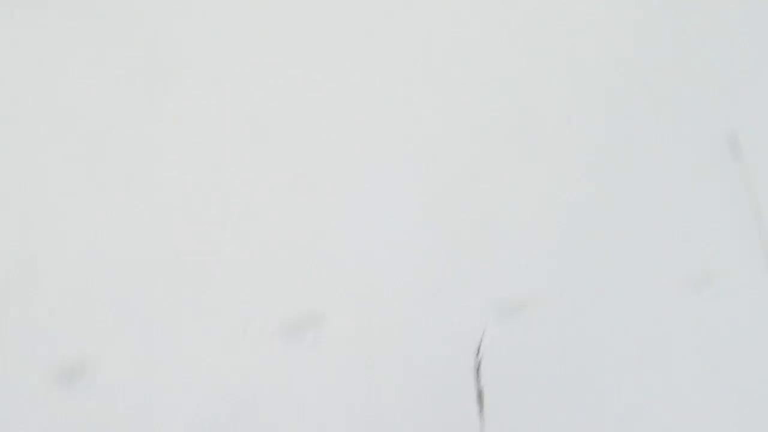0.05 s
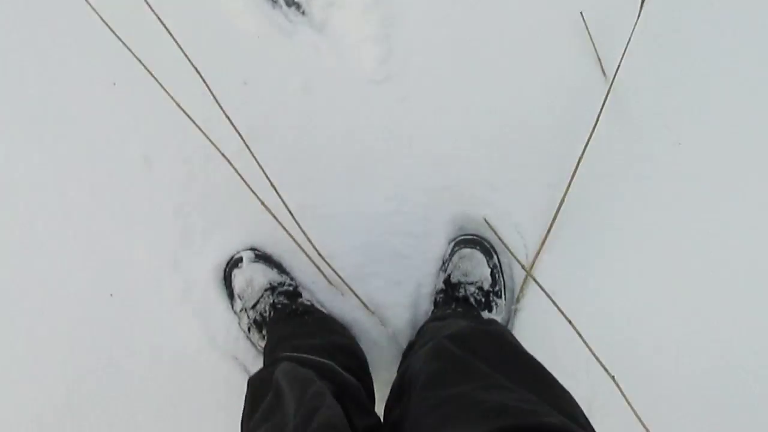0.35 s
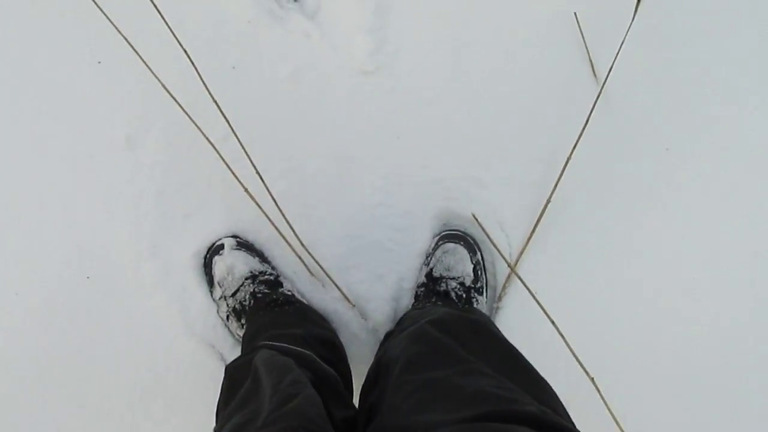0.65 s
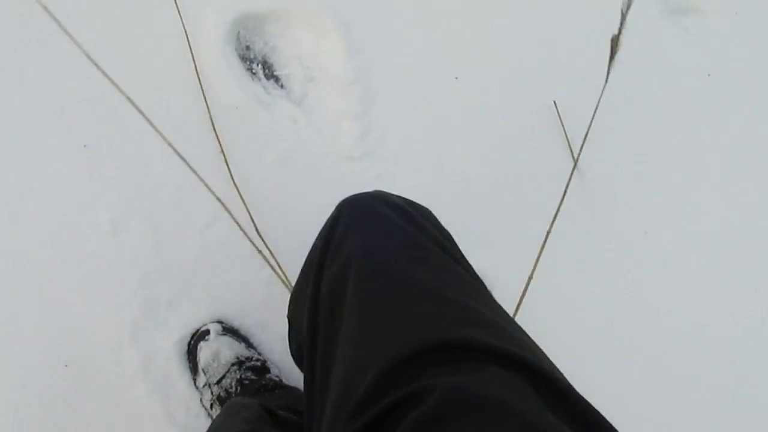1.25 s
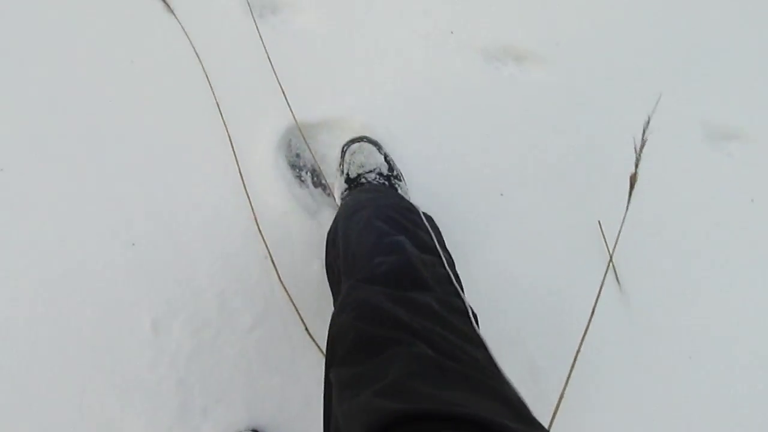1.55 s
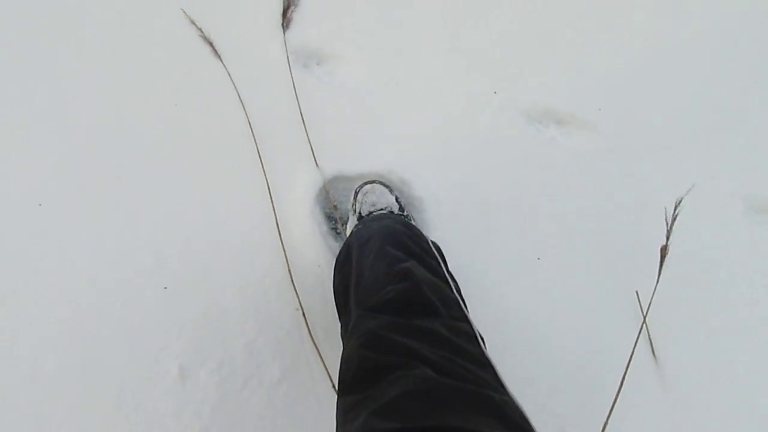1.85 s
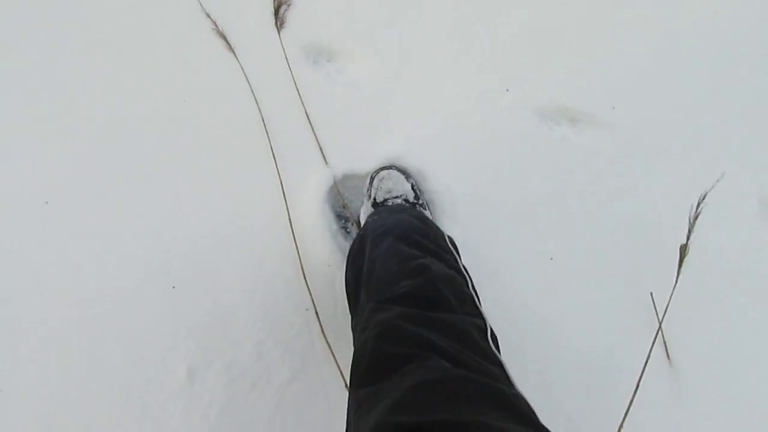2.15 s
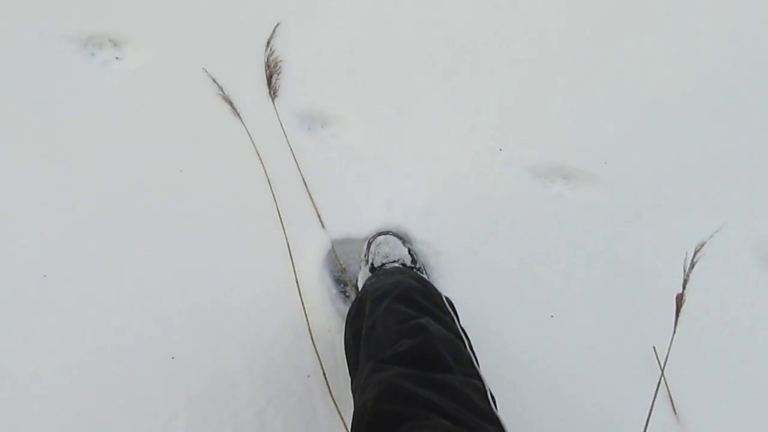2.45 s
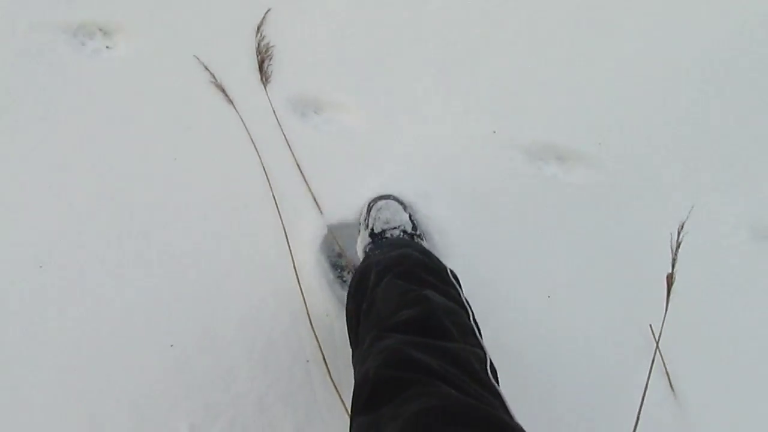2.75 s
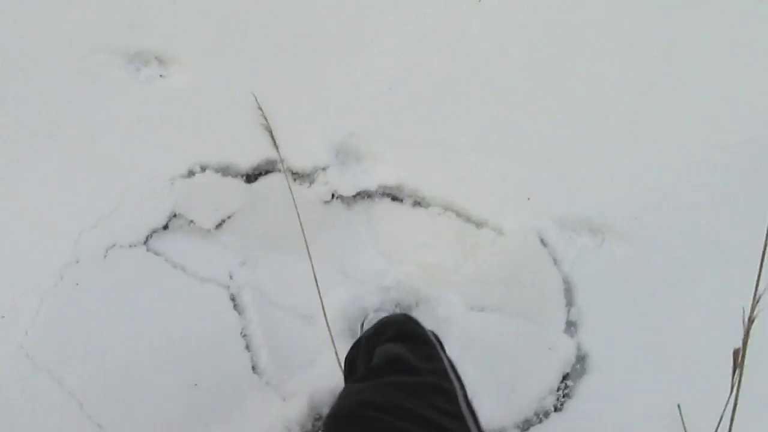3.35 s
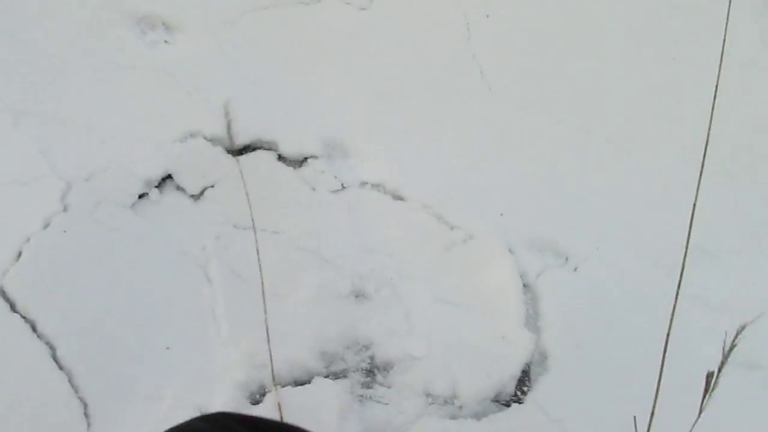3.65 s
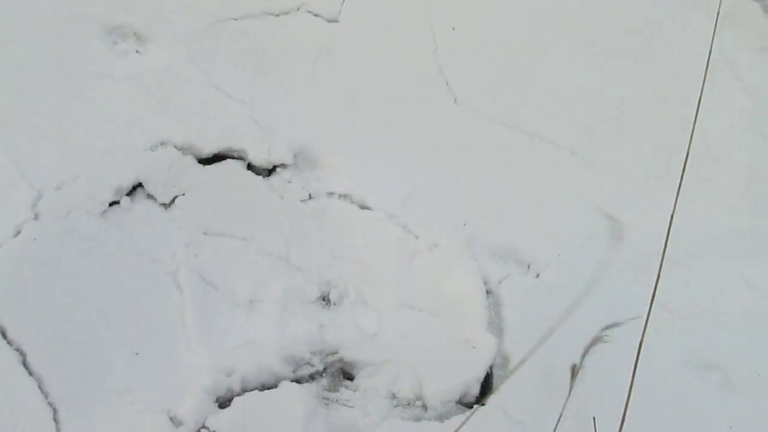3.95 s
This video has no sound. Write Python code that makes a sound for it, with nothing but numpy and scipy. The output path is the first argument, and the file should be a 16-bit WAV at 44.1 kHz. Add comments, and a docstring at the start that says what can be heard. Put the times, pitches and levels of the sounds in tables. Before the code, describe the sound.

Thin ice snaps sharply under a boot outdoors, then snow crunches softly and trousers rustle. The sheet breaks with a thump and crumbles with a faint slosh. Wind briefly buffets the close microphone, mostly on the left.

```python
"""Thin ice giving way

Outdoors on snow-covered ice, a walker edges out. Snow crunches and clicks under the boot, trousers
rustle, and the sheet snaps a few times under the shifting weight. Then it fails with a thump and
crumbles into the water. Wind buffets the hand-held stereo microphone, mostly on the left."""
import sys
import numpy as np
from scipy import signal
from scipy.fft import rfft, irfft
from scipy.io import wavfile
from scipy.ndimage import uniform_filter1d

SR = 44100
rng = np.random.default_rng(int(sys.argv[2]) if len(sys.argv) > 2 else 0)


def put_to_file(sound):
    """Save the sound as 16-bit audio at rate SR, in the file named by the first command-line argument."""
    columns = np.atleast_2d(sound).T  # one column per channel
    safe = np.clip(columns, -1, 1)
    whole_steps = np.round(safe * 32767)
    wavfile.write(sys.argv[1], SR, whole_steps.astype(np.int16))


N = 176400
BREAK_S = 3.1731  # the sheet gives way
SPREAD_HZ = 2540  # above this the two sides hear different things

# Low rumble of the breeze and of the dropping sheet: frequency_hz, level_db
RUMBLE_SPECTRUM = [(15, -15.5), (35, 4.5), (80, 2.5), (140, -3), (250, -19), (500, -30), (1500, -56.5)]
# Small brittle fractures in snow and ice: frequency_hz, level_db
FRACTURE_SPECTRUM = [(80, -33), (350, -1), (1300, 4), (2500, -5.5), (5500, -8), (10000, -16.5),
                     (16000, -28.5)]


def undb(db):
    return 10 ** (np.asarray(db) / 20)


def times():
    return np.arange(N) / SR


def curve(rows, column=1):
    """One column of a table, joined by straight lines in time."""
    rows = np.array(rows)
    return np.interp(times(), rows[:, 0], rows[:, column])


def pan(db):
    """Left and right gains for a level difference, left minus right."""
    return undb(np.array([np.atleast_1d(db), -np.atleast_1d(db)]) / 2)


def colour(x, spectrum):
    """Minimum-phase filter of unit power with the given (Hz, dB) shape."""
    points, size = np.array(spectrum), 4096
    hz = np.maximum(np.fft.rfftfreq(size, 1 / SR), 1)
    shape_db = np.interp(np.log(hz), np.log(points[:, 0]), points[:, 1])
    cepstrum = irfft(np.log(undb(shape_db)))
    cepstrum[1:size // 2] *= 2
    cepstrum[size // 2 + 1:] = 0
    impulse = irfft(np.exp(rfft(cepstrum)))
    return signal.fftconvolve(x, impulse[None] / np.linalg.norm(impulse), axes=1)[:, :N]


def highpass(x, hz, order=2):
    return signal.sosfilt(signal.butter(order, hz, "high", fs=SR, output="sos"), x)


def widen(x):
    """Two unrelated signals become a pair with common bass and diffuse treble, leaning right."""
    side = 0.97 * highpass(x[1], SPREAD_HZ, order=1)
    return x[0] + np.array([side, -side]) * pan(db=-5.5)


def wander(per_s):
    """Smooth random drift of spread near 1."""
    hold = max(int(SR / per_s), 1)
    return uniform_filter1d(np.repeat(rng.standard_normal(N // hold + 1), hold), hold)[:N]


def grains(per_s, scatter_db):
    """Tiny impulses at random moments and of uneven size; two signals of unit power."""
    hits = rng.random(N) < per_s / SR
    size = undb(scatter_db * np.clip(rng.standard_normal(N), -2, 2))
    x = hits * size * rng.choice([-1, 1], (2, N))
    return x / np.std(x)


def burst(start_s, swell_ms, decay_ms):
    """Straight rise, then exponential decay."""
    ms = (times() - start_s) * 1000
    return np.clip(ms / swell_ms, 0, 1) * np.exp(-np.clip((ms - swell_ms) / decay_ms, 0, 50))


def ring(start_s, hz, decay_ms):
    """A damped sine."""
    age = np.maximum(times() - start_s, 0)
    return np.sin(2 * np.pi * hz * age) * np.exp(-np.minimum(age * 1000 / decay_ms, 50))


def buffeting():
    """Gusts and single eddies hit each microphone port separately; weaker eddies thud lower."""
    # Gusts on the microphone: start_s, length_s, level_db, left_minus_right_db
    gusts = [(.0, .12, -14.5, 32), (0.12, 0.075, -23, 25), (0.224, 0.073, -23.5, 9),
             (1.596, 0.089, -26.5, -2.5)]
    # Turbulence at the ports: frequency_hz, level_db
    gust_spectrum = [(20, -18), (60, 2.5), (130, 1.5), (280, -3.5), (450, -13), (800, -28.5), (1600, -55),
                     (5000, -76)]
    # Single eddies: start_s, level_db, left_minus_right_db
    eddies = [(0.037, 1.5, 29), (0.0484, 3, 27), (.075, -4, 23), (0.1102, 2.5, 34), (0.16, -4.5, 26),
              (0.229, -17, -3), (0.9945, -7, 26), (1.388, -16, 5), (1.644, -6, -23), (1.668, -12.5, -18),
              (2.215, -21, 2)]
    ports = lambda side_db: pan(side_db) / pan(abs(side_db))[0]  # the louder side has gain 1
    t, envelope, thuds = times(), 0, 0
    for start, length, db, side_db in gusts:
        gate = np.clip(np.minimum(t - start, start + length - t) / 0.0021 + .5, 0, 1)
        envelope += undb(db) * ports(side_db) * gate
    turbulence = rng.standard_normal((2, N)) * undb(7.2 * np.tanh(wander(per_s=120)))
    for start, db, side_db in eddies:
        hz = 272 * 2 ** (db / 15)
        thuds += undb(db) * ports(side_db) * ring(start, hz, decay_ms=510 / hz)
    thuds = signal.sosfilt(signal.butter(5, 620, fs=SR, output="sos"), thuds)
    return envelope * colour(turbulence, gust_spectrum) + thuds


def breeze():
    """A light wind rumbles over the steady hush of open air, and drops after 3 s."""
    # Strength of the breeze: time_s, relative_db
    strength = [(.3, -43.5), (.85, -43.5), (.98, -36), (1.5, -44), (1.65, -30), (1.76, -45.5),
                (2.25, -41.5), (2.72, -51.5), (3.1, -45.5)]
    # Open air: frequency_hz, level_db
    air_spectrum = [(59, -15.5), (100, -3.5), (300, -7), (378, -13.5), (654, -13.5), (900, -18),
                    (2370, -29.5), (15500, -55)]
    calm_db = -10 * np.clip((times() - 3) / 0.29, 0, 1)
    rumble = colour(rng.standard_normal((2, N)), RUMBLE_SPECTRUM)
    rumble *= undb(curve(strength) + 4.5 + calm_db + 2 * np.tanh(wander(per_s=24.73)))
    air = highpass(widen(colour(rng.standard_normal((2, N)), air_spectrum)), hz=179)
    return rumble + air * undb(-45) * pan(db=-1)


def rustle():
    """Trousers and loose snow brush softly as the leg moves; once the cloth scrapes with a thin hiss."""
    # Brushing of the leg: time_s, relative_db
    movement = [(0.0, -61.5), (0.16, -56.5), (0.31, -61), (0.53, -58.5), (0.67, -49.5), (0.81, -74),
                (1.04, -53.5), (1.15, -60.5), (1.47, -55.5), (1.65, -48.5), (1.78, -56.5), (1.96, -55),
                (2.12, -63), (2.5, -66.5), (2.73, -64.5), (2.99, -58), (3.1, -50.5)]
    # Cloth and loose snow: frequency_hz, level_db
    cloth_spectrum = [(100, 11.5), (500, -0.5), (1200, 2), (2500, -7), (5000, -11), (10000, -19.5),
                      (15000, -34)]
    brush = widen(colour(grains(per_s=9000, scatter_db=1), cloth_spectrum))
    hiss_band = signal.butter(3, (4100, 5600), "band", fs=SR, output="sos")
    threads = signal.sosfilt(hiss_band, grains(per_s=1400, scatter_db=4))
    scrape = undb(-53) * burst(1.83, swell_ms=145, decay_ms=32) * widen(threads / np.std(threads))
    brush *= undb(curve(movement) + 6 + 4.5 * np.tanh(wander(per_s=60)))
    return (brush + scrape) * pan(db=-2)


def snow():
    """Snow packs under the boot in short bright crunches and slower, duller presses."""
    # Crunches of snow and grit: start_s, level_db, swell_ms, decay_ms
    crunches = [(.483, -35, 0.77, 5.7), (.501, -28, 3.7, 11.7), (.80, -47, 44, 15), (1.08, -42.5, 21, 32),
                (1.116, -33, 8.5, 15), (1.13, -33, 16, 23), (1.232, -41.5, 4.4, 5.7),
                (1.76, -48.5, 178, 56), (3.162, -25.5, 9.7, 5), (3.432, -25.5, 39, 42), (3.94, -34, 13, 50)]
    # The sole pressing into soft snow: start_s, level_db, swell_ms, decay_ms
    presses = [(1.89, -42.5, 45, 85), (1.97, -42, 12, 54), (2.235, -40, 56, 45), (3.437, -25, 8.3, 33)]
    # Soft snow packing: frequency_hz, level_db
    press_spectrum = [(120, -18), (350, -4.5), (580, 2.5), (850, -5.5), (1300, -6.5), (2500, -22),
                      (5000, -27.5), (12000, -40)]
    swells = lambda rows: sum(undb(db) * burst(start, swell, decay) for start, db, swell, decay in rows)
    crunch = swells(crunches) * widen(colour(grains(per_s=3500, scatter_db=5.5), FRACTURE_SPECTRUM))
    press = swells(presses) * widen(colour(grains(per_s=1000, scatter_db=0.5), press_spectrum))
    return (crunch + press) * pan(db=-2)


def cracks():
    """The fracture front ticks, the sheet springs back with a snap and a knock, and splinters shower."""
    # Cracks in the sheet: start_s, snap_db, pitch_hz, ring_ms, splinter_db, splinter_ms, treble_db
    fractures = [(.503, -27, 313, 7.8, -40, 9, -1), (0.6376, -25, 905, 2, -25.5, 16, -14),
                 (.6464, -3.5, 1320, 1.1, -25.5, 2.9, 1.5), (0.6896, 3, 1100, 0.72, -15, 11, -6.5),
                 (.6985, -15, 574, 6.4, -19.5, 9.5, -5), (0.7124, -12, 1510, 0.92, -25.5, 6.2, -1),
                 (0.7184, -16, 1100, 3.4, -36.5, 34, -2), (0.7729, -6.5, 1220, 0.59, -19.5, 3.6, -23),
                 (0.775, -16, 404, 3.3, -37.5, 44, -1.5), (1.613, -21.5, 1040, 1.6, -33, 4.7, 6),
                 (1.702, -26, 716, 5.4, -31.5, 15, 1), (2.891, -22, 520, 2.04, -38.5, 8.9, -8),
                 (3.1214, -15.5, 355, 3.4, -21.5, 11.3, -0.5), (3.1757, 0.5, 582, 2.5, -13, 4.2, 12.5),
                 (3.182, -14, 730, 7, -19, 11, 8.5), (3.2137, -7, 3570, 0.99, -29, 2.8, -2),
                 (3.449, -3.5, 1160, 1.3, -32, 2.4, 1), (3.465, -8.5, 990, 1.6, -30, 2.1, 4),
                 (3.927, -25, 3700, 1.4, -40, 3.3, 15.5)]
    # Ice splinters: frequency_hz, level_db
    splinter_spectrum = [(60, -32), (200, -11), (400, 4.5), (1100, -2.5), (2000, -4.5), (3500, -11),
                         (7000, -19.5), (12000, -23.5), (16000, -36)]
    shower = widen(colour(grains(per_s=5000, scatter_db=-1.5), splinter_spectrum))
    snaps, tick_gain, shower_gain, treble_gain = 0, 0, 0, 0
    for start, snap_db, hz, ring_ms, splinter_db, splinter_ms, treble_db in fractures:
        snap = highpass(ring(start, hz, ring_ms), hz / 2)
        knock = undb(-17.5) * ring(start, hz=412, decay_ms=4.2)
        snaps += undb(snap_db) * (snap + knock)
        tick_gain += undb(snap_db - 17 + treble_db / 2) * burst(start, swell_ms=0.082, decay_ms=1)
        envelope = undb(splinter_db) * burst(start, swell_ms=0.21, decay_ms=splinter_ms)
        shower_gain += envelope
        treble_gain += envelope * (undb(treble_db) - 1)
    ticks = tick_gain * colour(rng.standard_normal((2, N)), FRACTURE_SPECTRUM)
    splinters = shower_gain * shower + treble_gain * highpass(shower, hz=3700, order=1)
    return (snaps + ticks + splinters) * pan(db=-2)


def clicks():
    """Something hard at the boot makes brief contact and rings a few high resonances."""
    # Hard contacts: start_s, relative_db
    contacts = [(1.0037, -34.5), (1.6473, -29)]
    # Their resonances: pitch_hz, relative_db
    modes = [(2880, 3), (4500, -1), (6500, -0.5), (13000, -21)]
    envelope = sum(undb(db) * burst(start, swell_ms=0.4, decay_ms=2.4) for start, db in contacts)
    taps = envelope * rng.standard_normal((2, N))
    rings = sum(undb(db) * signal.lfilter(*signal.iirpeak(hz, Q=10, fs=SR), taps) for hz, db in modes)
    return 2 * widen(rings)


def collapse():
    """The sheet thumps and drops; slabs knock together and their edges crumble into grit and shards."""
    # Modes of the whole sheet as it fails: pitch_hz, level_db, decay_ms
    sheet_modes = [(104, -17.5, 31), (365, -12, 11.6)]
    # Crumbling edges: time_s, relative_db, left_minus_right_db
    crumbling = [(3.19, -21.5, -4.5), (3.252, -27.5, -0.5), (3.268, -23, -2.5), (3.334, -23.5, -2),
                 (3.37, -20.5, -1.5), (3.392, -29, -5), (3.42, -26.5, -3), (3.45, -20.5, -1.5),
                 (3.505, -21.5, -2.5), (3.535, -29.5, -8), (3.684, -30.5, -6.5), (3.706, -36, -7),
                 (3.912, -43, -7.5), (3.98, -44.5, -5.5)]
    # Ice grit: frequency_hz, level_db
    grit_spectrum = [(200, -3), (400, -1), (700, 2), (1200, -2), (2000, -0.5), (3200, -3), (5000, -8),
                     (8000, -13), (11000, -17.5), (15500, -30.5)]
    # Slabs knocking together: time_s, relative_db
    knocking = [(3.19, -21), (3.252, -38), (3.282, -29.5), (3.416, -32.5), (3.448, -23.5), (3.518, -34),
                (3.68, -37), (3.85, -45), (3.89, -60)]
    # Body of the slabs: frequency_hz, level_db
    slab_spectrum = [(30, -27), (70, -5.5), (130, 2), (220, 3), (350, 2), (550, -4.5), (1200, -25),
                     (4000, -49)]
    thump = undb(-0.5) * ring(BREAK_S, hz=159, decay_ms=3)
    thump += sum(undb(db) * ring(BREAK_S, hz, decay_ms) for hz, db, decay_ms in sheet_modes)
    rumble = colour(rng.standard_normal((1, N)), RUMBLE_SPECTRUM)
    drop = undb(-20) * burst(BREAK_S, swell_ms=3, decay_ms=26) * rumble
    grit = highpass(widen(colour(grains(per_s=5500, scatter_db=2), grit_spectrum)), hz=390)
    finer = 3.9 * np.clip(times() - 3.566, 0, .2)  # finer bits trickle down as the slabs settle
    debris = grit + finer * highpass(grit, SPREAD_HZ, order=1) + shards()
    debris *= undb(curve(crumbling) - 0.38 + 0.94 * np.tanh(wander(per_s=150)))
    debris *= pan(curve(crumbling, column=2))
    slabs = widen(colour(grains(per_s=350, scatter_db=2.5), slab_spectrum)) * undb(curve(knocking) + 1.5)
    onset = np.clip((times() - BREAK_S) / 0.0085, 0, 1)
    return onset * debris + (thump + drop + onset * slabs) * pan(db=-1)


def shards(count=45, low_hz=1170, high_hz=6100, decay_cycles=1.8):
    """Brittle pieces snap off after the break, each with its own pitch, size and side."""
    out, age = np.zeros((2, N)), np.arange(SR // 50) / SR
    for when, pitch, softness, side in rng.random((count, 4)):
        start = int(BREAK_S * SR + when * (N - len(age) - BREAK_S * SR))
        cycles = age * low_hz * (high_hz / low_hz) ** pitch
        snap = np.sin(2 * np.pi * cycles) * np.exp(-cycles / decay_cycles)
        out[:, start:start + len(age)] += undb(9.5 - softness) * pan(db=10 * (side - .5)) * snap
    return out


def water(rise_per_s=0.89):
    """Water sloshes under the tilting slabs: churning air pockets, each rising a little in pitch."""
    # Gulps under the slabs: start_s, pitch_hz, level_db
    gulps = [(3.323, 252, -20.5), (3.445, 266, -16), (3.591, 240, -23), (3.794, 297, -27.5),
             (3.838, 331, -27)]
    churn = wander(per_s=190) + 1j * wander(per_s=190)
    out = 0
    for start, hz, db in gulps:
        age = np.clip(times() - start, 0, .2)
        phase = 2 * np.pi * hz * age * (1 + rise_per_s * age / 2)
        pocket = np.imag(churn * np.exp(1j * phase))
        out += undb(db) * burst(start, swell_ms=3.5, decay_ms=14) * pocket
    return out


def surroundings(x):
    """Snow and reeds nearby scatter a faint, short tail back to the microphone."""
    tail = rng.standard_normal((2, N)) * burst(0.0027, swell_ms=3.4, decay_ms=33)
    return undb(-23) * signal.fftconvolve(x, tail / np.linalg.norm(tail[0]), axes=1)[:, :N]


def scene():
    """Sounds from underfoot carry into the surroundings; cloth and wind stay dry at the microphone."""
    underfoot = cracks() + collapse() + water() + snow() + clicks()
    return underfoot + surroundings(underfoot) + rustle() + buffeting() + breeze()


def record(dry):
    """The recorder has two narrow notches, clips the loudest peaks and cuts the top."""
    # Notches in the recorder's response: frequency_hz
    notches = [5950, 7800]
    for hz in notches:
        dry = signal.lfilter(*signal.iirnotch(hz, Q=30, fs=SR), dry)
    top_cut = signal.ellip(8, .2, 70, 15800, fs=SR, output="sos")
    return signal.sosfilt(top_cut, np.clip(dry, -1, 1))


dry = scene()
out = record(dry)
put_to_file(out)
```